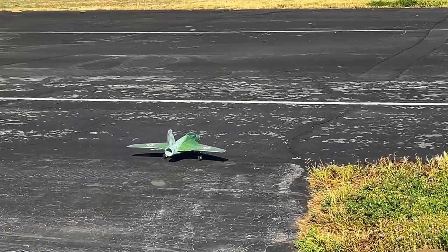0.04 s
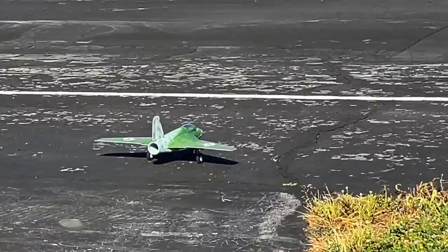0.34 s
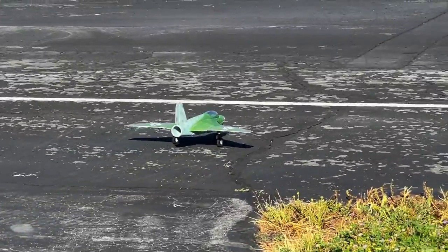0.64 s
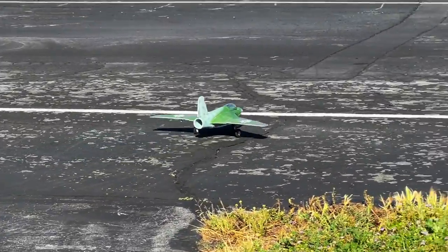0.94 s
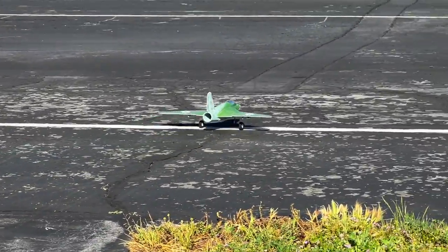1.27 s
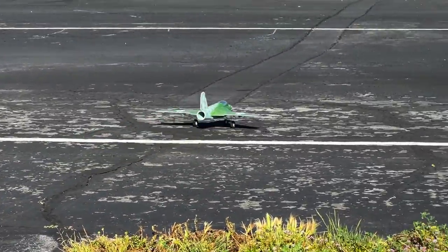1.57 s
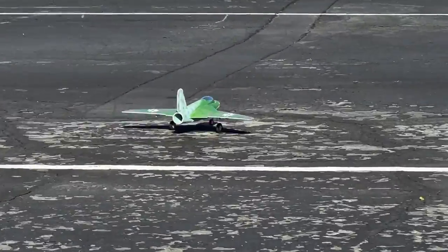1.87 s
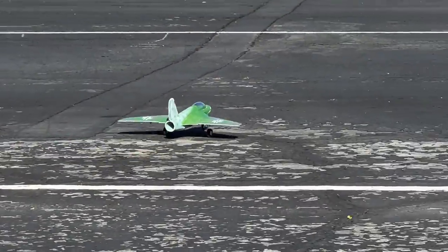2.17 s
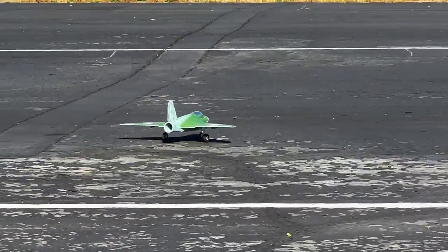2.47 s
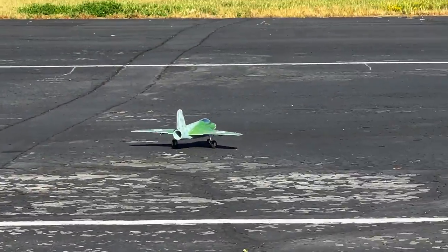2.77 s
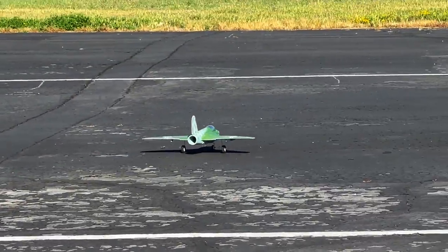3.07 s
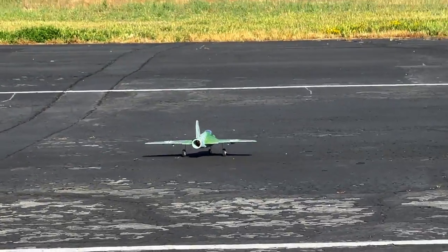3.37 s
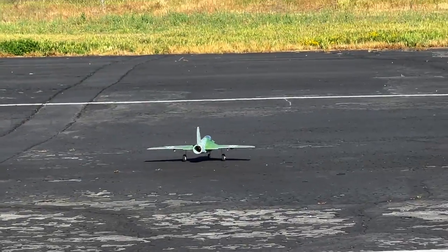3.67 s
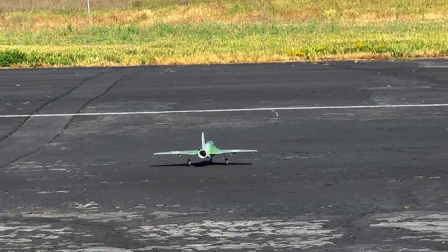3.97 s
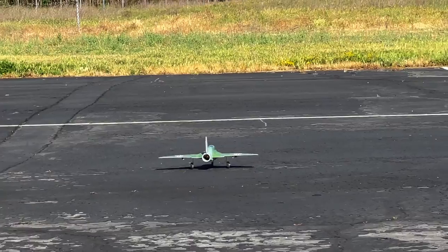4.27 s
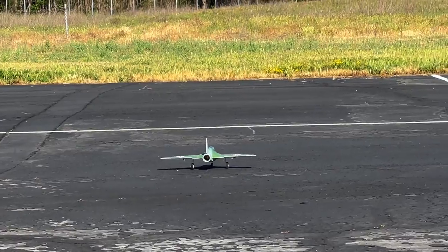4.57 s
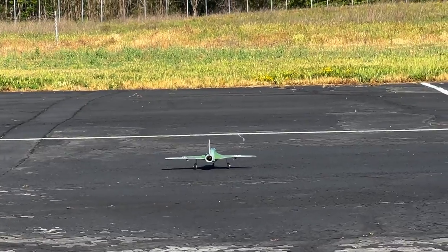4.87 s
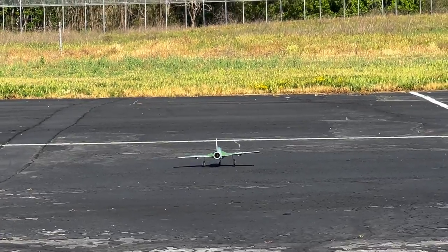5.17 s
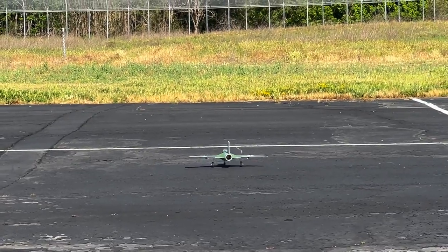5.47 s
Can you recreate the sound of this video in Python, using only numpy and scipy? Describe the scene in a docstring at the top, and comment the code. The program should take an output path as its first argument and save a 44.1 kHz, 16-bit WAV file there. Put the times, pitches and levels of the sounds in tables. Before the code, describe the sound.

Wind rumbles on the microphone as a model jet's fan whines, winds down while its wheels crunch over grit, then briefly spins up again.

```python
"""A small electric ducted-fan model jet taxis away outdoors, against a far steady rush, a faint hum and
wind buffeting the microphone. At first the throttle is open: the speed controller whines over the fan's
blade tones and exhaust. From about 0.5 s the wheels crunch and chatter over worn asphalt; at 1.6 s the
whine stops and the jet coasts, its axles squeaking from 3 s. At 3.6 s the whine returns and the fan spins
up again; near 5 s the tailpipe turns to the microphone, the throttle closes and the fan runs down."""
import sys
import numpy as np
from scipy import signal
from scipy.io import wavfile
from scipy.ndimage import uniform_filter1d

SR = 44100
rng = np.random.default_rng(int(sys.argv[2]) if len(sys.argv) > 2 else 0)


def waveform_to_disk(signal):
    """Save audio, clipped to [-1, 1], as 16-bit WAV at the path in sys.argv[1]."""
    frames = np.transpose(np.atleast_2d(signal))
    scaled = np.clip(frames, -1, 1) * 32767
    samples = np.round(scaled).astype(np.int16)
    wavfile.write(sys.argv[1], SR, samples)


N = 252693
TIME = np.arange(N) / SR
OPPOSED = np.array([[1], [-1]])  # sign of the side signal, left and right
FULL_TURNS_PER_S = 270
SCUFF_S = 0.023  # half-width of a scuff

# Levels in all tables are relative; each source applies its own gain.
# stereo width of airborne noise: f/Hz, side over mid/dB
AIR_WIDTH = [(150, -22), (350, -10.5), (600, -6), (1200, -5), (2400, -10.5), (4400, -3), (6500, -8.5),
             (8200, 3.5), (11000, 2.5), (15000, -4)]
# spectrum of a dull impact: f/Hz, density level/dB
IMPACT_SPECTRUM = [(200, -6), (900, 2.5), (1700, 0), (3000, -5.5), (5000, -25)]
# rough and smooth patches under the wheels: t/s, grit rise/dB, rolling rush rise/dB
SCUFFS = [(.885, 2, -0.5), (1.04, -4, -1), (1.105, 4.5, 2), (1.17, 7.5, 0), (1.32, -4, -4),
          (1.41, 1.5, -2.5), (1.56, 4, 2.5), (1.64, 8.5, 2), (1.70, 3.5, -1.5), (1.77, -10, -1),
          (1.86, -7, -0.5), (1.979, 8.5, 2), (2.05, 4, 0.5), (2.1, -4, -2.5), (2.16, 6.5, 2),
          (2.25, -7, -0.5), (2.31, 3.5, 0.5), (2.53, 8, 3.5), (2.579, 5.5, 0.5), (2.64, 5, 0.5),
          (2.685, -5, -1.5), (2.8, 5.5, -0.5), (2.85, -4, -1), (2.95, 7, 1.5), (3.15, -10, -1.5),
          (3.42, 1, -1.5)]
# controller's switching rate, settling as the motor restarts: t/s, f/Hz
SWITCHING_RATE = [(1.7, 7683), (3.63, 7790), (3.78, 7735), (3.88, 7700), (4.0, 7683)]


def from_db(db):
    """Amplitude ratio of a level in decibels."""
    return 10 ** (np.asarray(db) / 20)


def unit_rms(x):
    """Normalisation to unit mean power."""
    return x / np.sqrt(np.mean(x ** 2) + 1e-20)


def in_time(rows):
    """Linear interpolation of breakpoints: one curve per column after the time."""
    times, *columns = np.transpose(rows)
    return [np.interp(TIME, times, column) for column in columns]


def at_hz(points, hz):
    """Interpolation of a spectrum on a logarithmic frequency axis."""
    frequencies, levels = np.transpose(points)
    return np.interp(np.log(hz), np.log(frequencies), levels)


def drift(hz):
    """Random fluctuation of unit rms: noise low-passed by two poles at hz."""
    hop, run_in = 40, 2000
    pole = np.exp(-2 * np.pi * hz * hop / SR)
    noise = rng.standard_normal(N // hop + run_in + 2)
    slow = signal.lfilter([1], [1, -2 * pole, pole * pole], noise)[run_in:]
    return np.interp(np.arange(N) / hop, np.arange(len(slow)), unit_rms(slow))


def swells(times, heights, width_s):
    """Superposition of Gaussian rises around the given times."""
    return sum(height * np.exp(-((TIME - t) / width_s) ** 2) for t, height in zip(times, heights))


def decay(start, t60):
    """Exponential decay from a sudden onset, 60 dB in t60 seconds."""
    return (TIME >= start) * from_db(-60 * np.clip((TIME - start) / t60, 0, 4))


def resonance(x, hz, width_hz):
    """Response of a second-order resonator with unit peak gain."""
    return signal.lfilter(*signal.iirpeak(hz, hz / width_hz, fs=SR), x)


def panned(x, pan_db):
    """Level difference of left over right, at constant mean gain."""
    gains = from_db(OPPOSED * pan_db / 2)
    return x * gains / gains.mean(axis=0)


def white():
    """Two uncorrelated mid/side pairs of white noise."""
    return rng.standard_normal((2, 2, N))


def coloured(drive, spectrum, width, flicker_db):
    """Spectral shaping in third octaves, each with its own level, flicker and width; mid rms 1."""
    edges = 15.7 * 2 ** (np.arange(31) / 3)
    mid_side = np.zeros((2, N))
    drive = np.concatenate([drive[..., -SR // 10:], drive], axis=-1)  # run-in for the low bands
    for k, (low, high) in enumerate(zip(edges, edges[1:])):
        hz = np.sqrt(low * high)
        if spectrum[0][0] < high and low < spectrum[-1][0]:
            bandpass = signal.butter(2, [low, high], "band", fs=SR, output="sos")
            band = signal.sosfilt(bandpass, drive[k % 2])[:, -N:]
            gain = from_db(at_hz(spectrum, hz) + flicker_db * drift(21.3))
            mid_side += band * from_db([[0], [at_hz(width, hz)]]) * gain
    mid, side = mid_side / np.std(mid_side[0])
    return mid + OPPOSED * side


def port_tone(phase, side_db):
    """Phase difference: a tone reaches the two microphone ports out of step; mid rms 1."""
    return np.sqrt(2) * (np.sin(phase) + OPPOSED * from_db(side_db) * np.cos(phase))


def far_rush(level_db=-40.0, fade_db_per_s=-0.52):
    """Broadband noise of open air and rolling sinks as the jet recedes and varies with each scuff."""
    # dull rush: f/Hz, density level/dB
    spectrum = [(150, 3), (300, 2.5), (450, 0), (650, 3), (850, 5.5), (1080, 6), (1350, 0), (1900, -2.5),
                (2600, -9), (3600, -18.5), (6000, -34), (15000, -100)]
    times, _, rises = np.transpose(SCUFFS)
    db = level_db + fade_db_per_s * TIME + swells(times, rises, SCUFF_S)
    return from_db(db) * coloured(white(), spectrum, AIR_WIDTH, flicker_db=1.1)


def hum(hz=232.8, level_db=-48, overtone_db=-7, fade_db_per_s=-3.5):
    """A faint tone and its fourth harmonic fade, wavering by random frequency and amplitude modulation."""
    phase = 2 * np.pi * np.cumsum(hz + 2.0 * drift(6.2)) / SR
    tone = port_tone(phase, side_db=-14) + from_db(overtone_db) * port_tone(4 * phase, side_db=-14)
    return from_db(level_db + fade_db_per_s * TIME + 2 * drift(12.0)) * tone


def wind(rumble_gain_db=-6.5, flutter_gain_db=0.5, flutter_lean=0.18, lumpy_db=1.14, gust_s=0.052):
    """Turbulent pressure at the microphone: a deep rumble, often at one port, under a lumpier flutter."""
    # breeze between gusts: t/s, rumble level/dB, flutter level/dB
    breeze = [(0, -24.5, -31.5), (1.5, -18, -29), (2.5, -26.5, -32.5), (3.3, -24, -31), (4.1, -23.5, -28),
              (4.9, -24.5, -32.5), (5.73, -28.5, -27)]
    # the breeze strikes one port, then the other: t/s, left over right/dB
    lean = [(0.0, -29), (0.05, -10.5), (0.61, -7.5), (0.67, 4), (1.63, 8), (1.68, 13), (1.85, 0),
            (1.93, 4.5), (2.26, 20), (2.71, -17), (3.5, -7.5), (3.61, -30), (3.72, -17), (4.28, -6),
            (4.71, 9), (5.73, 5.5)]
    # gusts and lulls: t/s, rumble rise/dB, flutter rise/dB
    gusts = [(.15, 11, 1), (.52, 6, 7), (.66, 11, 2), (1.69, 3.5, 3), (1.83, 6.5, 1), (2.18, 4.5, 2.5),
             (2.79, 7, 1), (3.08, 6.5, 1), (3.65, 5.5, -2), (4.13, 2.5, 3), (4.22, -17, 2), (4.52, 10.5, 0),
             (4.7, 10, 2.5)]
    # spectra of the eddies: f/Hz, density level/dB
    rumble_spectrum = [(14, -5.5), (25, 1.5), (45, -12.5), (65, -15.5), (90, -18), (200, -47)]
    flutter_spectrum = [(45, 3.5), (70, 5), (100, -1), (125, -2), (170, -13.5), (240, -17), (400, -37),
                        (900, -41.5)]
    # stereo width of the eddies: f/Hz, side over mid/dB
    width = [(20, 7.5), (45, -7), (80, -10.5), (200, -6.5)]
    rumble_db, flutter_db = in_time(breeze)
    pan_db, = in_time(lean)
    times, rumble_rises, flutter_rises = np.transpose(gusts)
    rumble_db += rumble_gain_db + swells(times, rumble_rises, gust_s)
    flutter_db += flutter_gain_db + swells(times, flutter_rises, gust_s) + lumpy_db * drift(21.3)
    rumble = from_db(rumble_db) * coloured(white(), rumble_spectrum, width, flicker_db=-1.5)
    flutter = from_db(flutter_db) * coloured(white(), flutter_spectrum, width, flicker_db=1.0)
    return panned(rumble, pan_db) + panned(flutter, flutter_lean * pan_db)


def bumps(rise_s=0.0041, sag_s=0.0038, rattle_t60=0.22):
    """Each buffet at the microphone is a damped low oscillation, sagging in pitch, with a dull rattle."""
    # buffets: t/s, thump level/dB, starting f/Hz, rattle level/dB
    buffets = [(1.477, -23.5, 384, -38.5), (1.503, -21, 412, -40), (3.658, -21, 320, -39),
               (3.686, -23, 395, -49), (4.049, -23, 288, -44), (4.086, -20, 356, -47),
               (4.182, -15, 165, -60), (5.17, -17.5, 232, -42), (5.196, -31, 305, -45),
               (5.362, -17, 338, -63), (5.588, -17, 214, -62)]
    thumps = 0
    for t, db, hz, _ in buffets:
        age = np.clip(TIME - t, 0, 20 * rise_s)
        envelope = age / rise_s * np.exp(1 - age / rise_s)
        phase = 2 * np.pi * hz * sag_s * np.log1p(age / sag_s)
        thumps += from_db(db) * envelope * np.sin(phase)
    shaking = white() * sum(from_db(db) * decay(t, rattle_t60) for t, _, _, db in buffets)
    return thumps + np.std(shaking) * coloured(shaking, IMPACT_SPECTRUM, AIR_WIDTH, flicker_db=1)


def axle_squeaks(waver_hz=35, half_width_s=.025):
    """Dry friction: for a few turns of the wheels, each axle sings briefly once a turn."""
    # squeaks: t/s, f/Hz, level/dB
    squeaks = [(3.01, 3180, -57.5), (3.14, 7450, -70), (3.24, 3180, -55.5), (3.375, 7450, -66),
               (3.465, 3180, -55), (3.595, 7400, -67), (3.70, 3180, -59)]
    waver = waver_hz * drift(66)
    tones = 0
    for t, hz, db in squeaks:
        phase = 2 * np.pi * np.cumsum(hz + waver) / SR
        tones += swells([t], [from_db(db)], half_width_s) * port_tone(phase, side_db=-5)
    return tones


def airframe_knocks():
    """Free vibration: rolling over a joint sets the hollow airframe's damped modes ringing."""
    # impacts at the joints: t/s, level/dB
    knocks = [(1.479, -38), (3.66, -37.5), (3.684, -57), (5.172, -38.5), (5.192, -36.5)]
    # airframe modes: f/Hz, level/dB, t60/s
    modes = [(568, 2.5, 0.071), (700, -11, 0.055), (808, 4, 0.055), (870, 3, .07), (990, 1.5, 0.091),
             (1470, 0, 0.07), (1530, -19, 0.06), (1730, -5, 0.11), (2010, -16, .05)]
    return sum(from_db(db + mode_db) * decay(t, t60) * np.sin(2 * np.pi * hz * (TIME - t))
               for t, db in knocks for hz, mode_db, t60 in modes)


def stones(crack_db=-7, crack_t60=0.026, tock_db=-3, tock_t60=0.036):
    """Impact noise: a larger stone gives a crisp crack and a duller, longer tock from the wheel."""
    # stones struck: t/s, crack level/dB, tock offset/dB
    hits = [(0.6305, -26.5, 0), (0.973, -35, -14), (1.16, -29, 0.5), (1.358, -33, -13), (1.437, -29, -7),
            (1.544, -34, -9), (1.6307, -42, -4), (1.714, -28, -5), (1.8866, -44, 3), (1.934, -45, -1),
            (2.054, -34, 2.5), (2.119, -30, -8), (2.274, -45, 0), (2.302, -36.5, 5), (2.3805, -43, -4),
            (2.396, -35, -6), (2.494, -34, 3), (2.512, -37, -2), (2.5524, -33, -6), (2.577, -32, -14),
            (2.6269, -32, -9), (2.7154, -31, -6), (2.732, -35, -15), (3.1233, -39, -4), (3.2126, -40, -13),
            (3.275, -41, -6), (3.3282, -36.5, 2), (3.5096, -36, 1), (3.5694, -37, -2)]
    # a stone's crack: f/Hz, density level/dB
    crack_spectrum = [(2500, 9), (5000, 7.5), (8500, 6), (11500, 7), (15700, -25)]
    cracks = sum(from_db(db) * decay(t, crack_t60) for t, db, _ in hits)
    tocks = sum(from_db(db + offset_db) * decay(t, tock_t60) for t, db, offset_db in hits)
    crack_envelope = from_db(crack_db) * uniform_filter1d(cracks, size=140)
    tock_envelope = from_db(tock_db) * uniform_filter1d(tocks, size=100)
    crack_noise = coloured(white(), crack_spectrum, AIR_WIDTH, flicker_db=1)
    tock_noise = coloured(white(), IMPACT_SPECTRUM, AIR_WIDTH, flicker_db=.5)
    return crack_envelope * crack_noise + tock_envelope * tock_noise


def worn_share(from_s=.55, until_s=2.9, edge_s=.25):
    """Surface roughness: 1 on the worn, flaking asphalt, ramping to 0 on the smooth."""
    return np.clip(np.minimum(TIME - from_s, until_s - TIME) / edge_s + .5, 0, 1)


def gear_chatter(level_db=-49, surge=1.5, ticks_per_s=130, tick_s=.002, size_db=2.5):
    """Random impacts: on worn asphalt the landing gear ticks dully, surging with each scuff."""
    # landing gear's chatter: f/Hz, density level/dB
    spectrum = [(600, 0.5), (1100, 5), (2200, 6), (3200, -4.5)]
    times, _, rises = np.transpose(SCUFFS)
    onsets = rng.random(N) < ticks_per_s / SR
    sizes = from_db(size_db * np.minimum(rng.exponential(1, N), 3))
    shaking = signal.lfilter([1], [1, -np.exp(-1 / (tick_s * SR))], onsets * sizes + 1e-18)
    gain = worn_share() * from_db(level_db + surge * swells(times, rises, SCUFF_S))
    return gain * coloured(white() * shaking, spectrum, AIR_WIDTH, flicker_db=0.5)


def wheel_grit(level_db=-45.5, worn_db=4.5, grains_per_s=400, grain_s=0.0014):
    """Shot noise: hard wheels crush grains of grit, whose energies add to a smooth rolling hiss."""
    # crushed grit: f/Hz, density level/dB
    spectrum = [(900, 17), (2300, 15), (3600, 11), (5000, 10.5), (8500, 9.5), (11700, 11), (13500, -20),
                (15700, -30)]
    size_db, hiss_energy, clump_db = 2.7, .35, 1.8
    times, rises, _ = np.transpose(SCUFFS)
    surface_db = worn_db * worn_share() + swells(times, rises, SCUFF_S)
    onsets = rng.random(N) < grains_per_s / SR
    sizes = from_db(size_db * np.minimum(rng.exponential(1, N), 4))
    energy = signal.lfilter([1], [1, -np.exp(-2 / (grain_s * SR))], onsets * sizes ** 2 + 1e-18)
    energy = uniform_filter1d(energy, size=60)
    clumping = from_db(clump_db * np.tanh(drift(14)))
    envelope = np.sqrt(np.abs(energy / energy.mean() + hiss_energy)) * clumping
    crunch = coloured(white() * envelope, spectrum, AIR_WIDTH, flicker_db=-1.5)
    return from_db(level_db + surface_db) * crunch


def motor_load(turns_per_s, full_turns_per_s2=150):
    """Load follows angular acceleration: towards 1 as the rotor is driven up, -1 as it slows quickly."""
    acceleration = np.gradient(uniform_filter1d(turns_per_s, size=4000)) * SR
    return np.tanh(acceleration / full_turns_per_s2)


def exhaust(turns_per_s, level_db=-37, speed_exponent=3):
    """Flow noise leaves the duct and excites its resonances, growing as a power of the rotor speed."""
    # rushing air: f/Hz, density level/dB
    spectrum = [(700, -60), (1400, 16), (2400, 4), (3500, -15), (5500, 0), (7000, 1.5), (8500, 7),
                (11000, 9), (13500, 10), (15700, -12)]
    # duct resonances: f/Hz, bandwidth/Hz, level/dB
    duct_modes = [(1577, 60, -57), (1900, 170, -48.5), (2800, 86, -52)]
    rush = from_db(level_db) * coloured(white(), spectrum, AIR_WIDTH, flicker_db=2.0)
    for hz, width_hz, db in duct_modes:
        mid, side = unit_rms(resonance(rng.standard_normal((2, N)), hz, width_hz))
        rush += from_db(db) * (mid + OPPOSED * side * from_db(at_hz(AIR_WIDTH, hz)))
    return (turns_per_s / FULL_TURNS_PER_S) ** speed_exponent * rush


def blade_tones(angle, turns_per_s, level_db=-40.5, speed_exponent=3.1, waver_db=3.0, jitter_rad=.2):
    """Rotor harmonics swell as they cross the duct's resonances; uneven inflow roughens them."""
    # five-bladed rotor, strongest at the blade-passing rate: shaft order, level/dB
    harmonics = [(1, -5), (2, -13), (4, -12), (5, 0.5), (10, -10.5), (11, -19), (12, -24), (15, -14.5),
                 (18, -26), (20, -28), (27, -23), (36, -28)]
    # duct's response: f/Hz, gain/dB
    duct = [(200, -1), (850, -1), (930, 3), (1020, 5.5), (1130, 4), (1230, 0), (1350, -3.5), (1800, 2),
            (2030, 11), (2170, 5), (2400, -1), (2700, -4), (3000, 1), (3300, 5), (3750, 3.5), (4000, -9),
            (5200, -1), (5750, 9), (6400, 10), (7000, 2), (7400, -5), (11000, -5)]
    # directivity, as the tailpipe turns to the microphone: t/s, gain/dB
    beaming = [(4.4, 0), (4.85, 2.5), (5.02, 7), (5.73, 7)]
    load_db = 2.5 * motor_load(turns_per_s)
    tones = 0
    for order, db in harmonics:
        db += load_db * (order > 12)  # only the upper harmonics follow the load
        gain = from_db(db + at_hz(duct, order * turns_per_s) + waver_db * drift(32))
        phase = order * angle + jitter_rad * np.sqrt(order) * drift(30) + rng.uniform(0, 2 * np.pi)
        tones += gain * port_tone(phase, side_db=-25)
    beam_db, = in_time(beaming)
    return from_db(level_db + beam_db) * (turns_per_s / FULL_TURNS_PER_S) ** speed_exponent * tones


def casing_chirps(switching_phase, angle, step_db=4.0, waver_db=4.0, smear_rad=1.1):
    """Stator-slot sidebands sweep through the motor casing's resonances; one sum per switching harmonic."""
    # casing resonances: switching harmonic, sideband spacing/shaft orders, sideband count,
    # f/Hz, bandwidth/Hz, level/dB
    casing_modes = [(1, -9, 4, 6450, 480, -22.5), (1, -9, 1, 7280, 120, -14), (1, 9, 2, 8280, 170, -16),
                    (1, 18, 1, 11400, 700, -24.5), (2, -9, 3, 15250, 400, -23),
                    (2, -12, 1, 14000, 1200, -29)]
    switching_hz, = in_time(SWITCHING_RATE)
    chirps = {1: 0, 2: 0}
    for harmonic, spacing, count, mode_hz, width_hz, db in casing_modes:
        for k in range(1, count + 1):
            sweep = spacing * k * angle
            hz = harmonic * switching_hz + np.gradient(sweep) * SR / (2 * np.pi)
            detuning = (hz - mode_hz) / (width_hz / 2)
            phase = harmonic * switching_phase + sweep + smear_rad * k * drift(90)
            gain = from_db(db + step_db * k + waver_db * drift(60)) / (1 + detuning ** 2) ** (k / 2)
            chirps[harmonic] += gain * port_tone(phase, side_db=1.0)
    return chirps


def controller_whine(angle, turns_per_s, level_db=1.5, waver_db=1.5, load_db=-9):
    """Modulation: under throttle the windings sing at the switching rate and its octave, with sidebands."""
    # one table per burst of throttle: t/s, level/dB, left over right/dB, octave lift/dB
    bursts = [
        [(0, -42.5, -1, -2), (.2, -39, 2.5, -4), (.43, -41.5, 2, -5), (.51, -49, 2, -9), (1.0, -56.5, 1, -6),
         (1.6, -55.5, 3, 6)],
        [(3.63, -67, -2, 9), (3.76, -47, -4, 7), (3.87, -44.5, -3, 0), (4.2, -58.5, 2, -3),
         (4.29, -57.5, -6.5, -3), (5.11, -62, -.5, 6)],
    ]
    # carriers and the rotor's sidebands: switching harmonic, offset/shaft orders, level/dB
    partials = [(1, 0, 0), (1, 1, -10), (1, -1, -14), (1, 2, -24), (1, -2, -22), (1, -3, -25), (1, 5, -26),
                (2, 0, -22), (2, -1, -26), (2, 1, -28), (2, -2, -32)]
    # sideband strength, greatest at part throttle: rotation f/Hz, level/dB
    sideband_depth = [(20, -24), (150, -8), (188, 3), (245, 4), (270, 0)]
    stutter_rad, smooth_turns_per_s = .7, 130  # below this speed the restarting motor stutters
    switching_hz, = in_time(SWITCHING_RATE)
    stutter = stutter_rad * np.clip(1 - turns_per_s / smooth_turns_per_s, 0, 1) * drift(120)
    switching_phase = 2 * np.pi * np.cumsum(switching_hz + 3.0 * drift(12)) / SR + stutter
    pull = np.maximum(motor_load(turns_per_s), 0)
    depth = from_db(at_hz(sideband_depth, turns_per_s) + load_db * pull ** 2)
    tones = casing_chirps(switching_phase, angle)
    for harmonic, order, db in partials:
        phase = harmonic * switching_phase + order * angle + rng.uniform(0, 2 * np.pi)
        gain = (depth if order else 1) * from_db(db + waver_db * drift(34))
        tones[harmonic] += gain * port_tone(phase, side_db=4.5)
    whine = 0
    for burst in bursts:
        db, pan_db, octave_db = in_time(burst)
        opens_s, closes_s = burst[0][0], burst[-1][0] - .03
        throttle = uniform_filter1d(1.0 * (TIME >= opens_s) * (TIME < closes_s), size=400)
        singing = tones[1] + from_db(octave_db) * tones[2]
        whine += panned(singing, pan_db) * throttle * from_db(db + level_db)
    return whine


def scene(start_m=1.84, taxi_m_per_s=1.94):
    """Superposition: one rotor speed drives fan and sidebands; fan and grit fall off as 1/distance."""
    # rotor speed: t/s, rotation f/Hz
    rotor_speed = [(0, 269.8), (.47, 269), (.57, 241), (.7, 217), (1.05, 186), (1.57, 186), (1.8, 120),
                   (3.0, 20), (3.66, 20), (3.9, 176), (4.0, 212), (4.25, 243), (4.45, 252), (4.62, 244),
                   (4.85, 216), (5.08, 195), (5.73, 70)]
    turns_per_s, = in_time(rotor_speed)
    angle = 2 * np.pi * np.cumsum(turns_per_s + .6 * drift(15)) / SR
    spreading = start_m / (start_m + taxi_m_per_s * TIME)
    fan = spreading * (blade_tones(angle, turns_per_s) + exhaust(turns_per_s))
    whine = controller_whine(angle, turns_per_s)
    rolling = spreading * wheel_grit() + gear_chatter() + stones() + airframe_knocks() + axle_squeaks()
    return whine + fan + rolling + hum() + wind() + bumps() + far_rush()


def record(dry, cutoff_hz=15700):
    """Resonance in the microphone ports ripples the treble; a steep low-pass cuts the top."""
    # port resonances and notches: f/Hz, bandwidth/Hz, gain/dB
    ports = [(4820, 57, 5), (5980, 150, -4), (8520, 410, 6), (10060, 2300, -8), (11300, 500, 1.5),
             (12740, 5600, -12)]
    for hz, width_hz, db in ports:
        dry = dry + (from_db(db) - 1) * resonance(dry, hz, width_hz)
    return signal.sosfilt(signal.ellip(12, .2, 90, cutoff_hz, fs=SR, output="sos"), dry)


dry = scene()
out = record(dry)
waveform_to_disk(out)
```